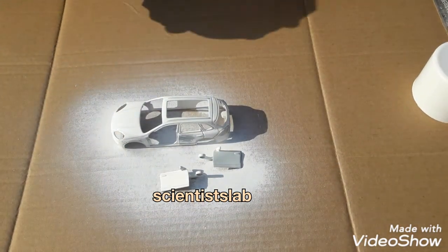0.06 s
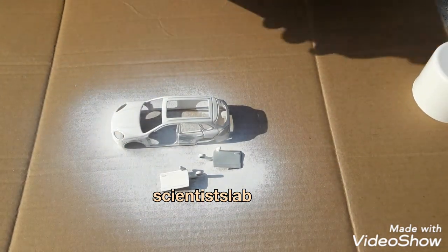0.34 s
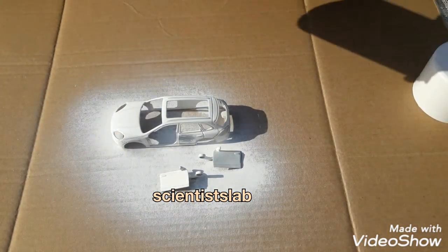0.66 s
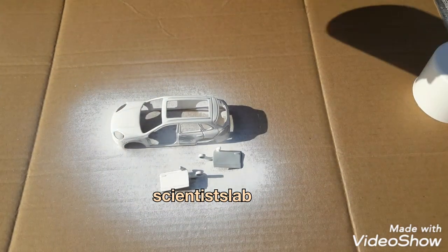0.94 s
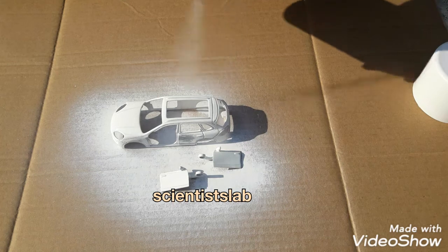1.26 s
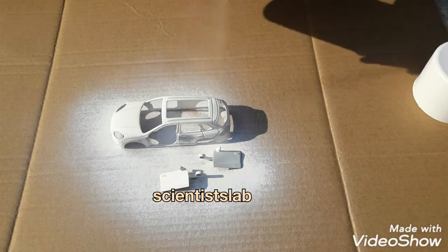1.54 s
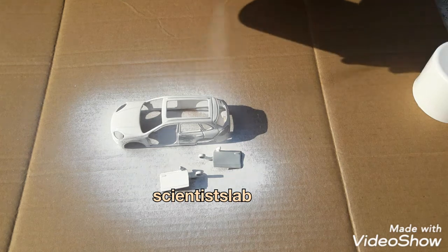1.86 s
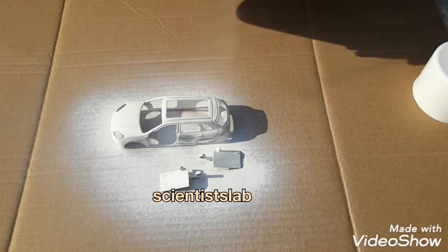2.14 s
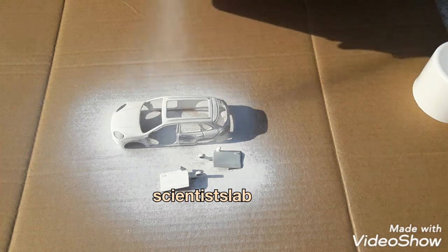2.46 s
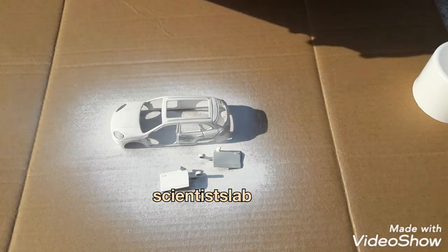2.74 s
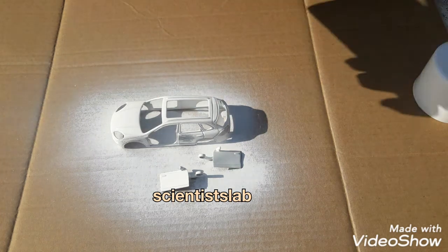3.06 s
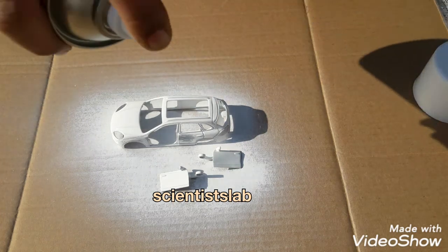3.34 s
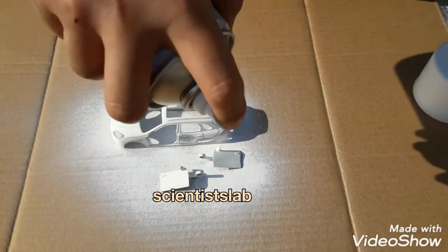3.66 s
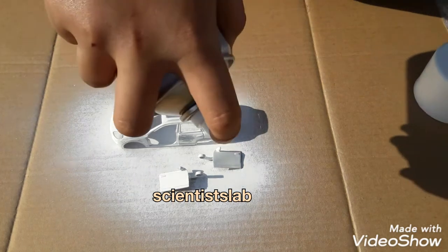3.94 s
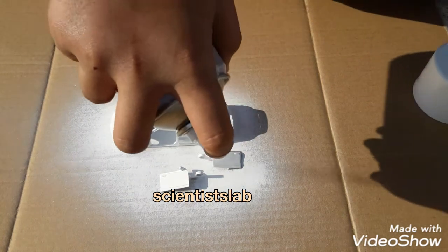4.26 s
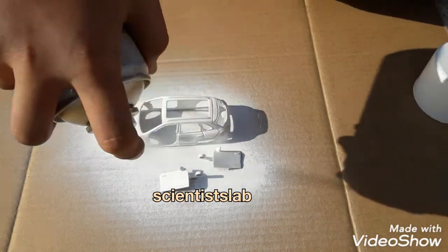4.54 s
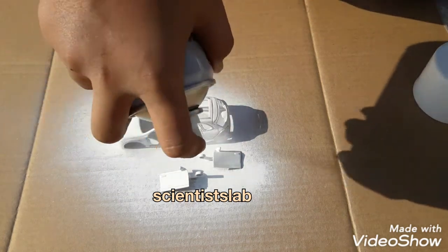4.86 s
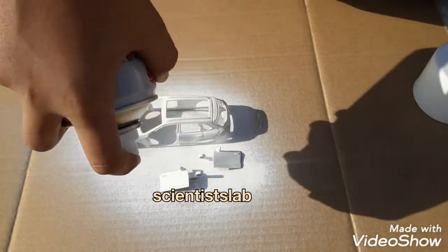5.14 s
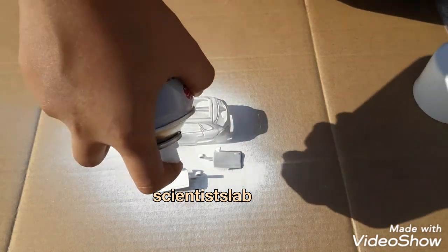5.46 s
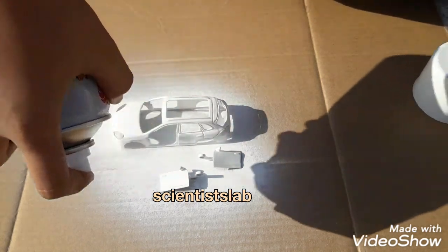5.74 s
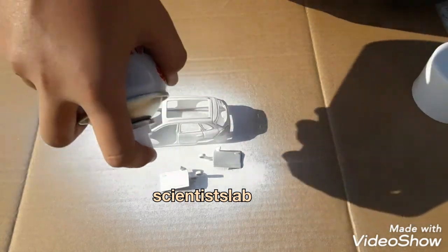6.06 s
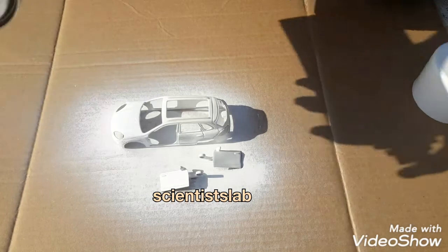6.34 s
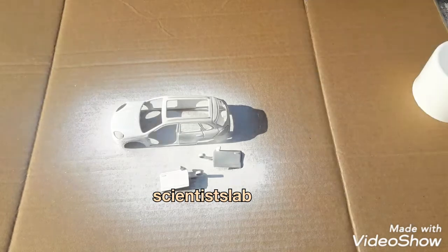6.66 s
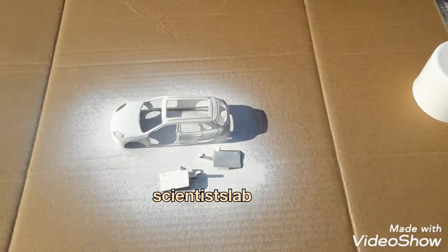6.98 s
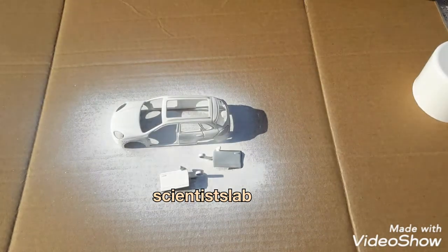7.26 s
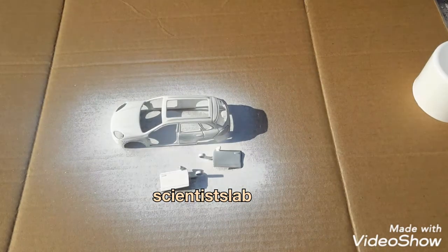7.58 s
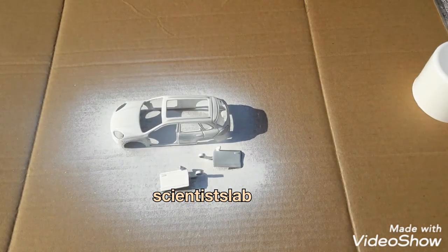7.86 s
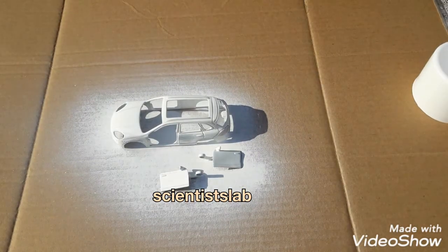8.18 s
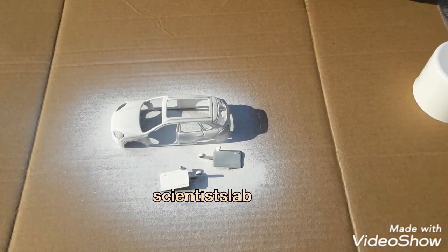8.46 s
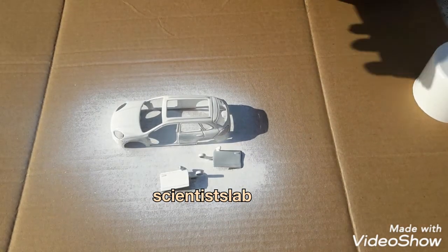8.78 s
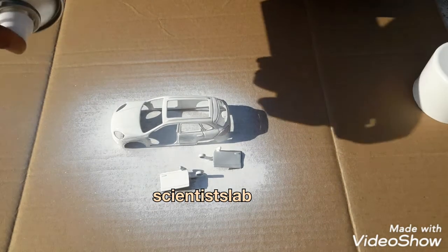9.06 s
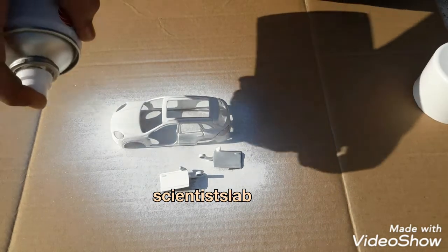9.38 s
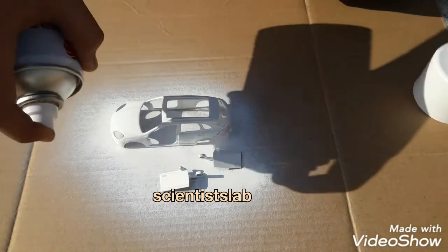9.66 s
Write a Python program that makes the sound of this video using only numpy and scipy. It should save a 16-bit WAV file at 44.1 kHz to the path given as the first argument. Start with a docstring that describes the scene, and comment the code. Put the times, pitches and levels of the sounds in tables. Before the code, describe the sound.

The mixing ball ticks inside a spray paint can as a bright, close hiss starts and sways over a small model. The spraying stops and returns for two more passes. In a longer pause the ball rattles lightly and the can brushes cardboard, then a few short spurts follow. The outdoor background is quiet, with low rumble, a thin motor whine and far birds.

```python
"""Spray painting in a yard

A small model on a cardboard sheet is painted with short bursts from an aerosol can.
The hiss mixes with its echo off the cardboard. The mixing ball pings and rolls inside
the can as it is tilted and handled, and the can scuffs over the sheet. Across the yard
an electric motor whines over a low rumble and the hiss of open air, and far birds chirp."""
import sys
import numpy as np
from scipy import signal
from scipy.fft import rfft, irfft, next_fast_len
from scipy.io import wavfile
from scipy.ndimage import map_coordinates

SR = 44100
rng = np.random.default_rng(int(sys.argv[2]) if len(sys.argv) > 2 else 0)


def pcm_store(signal):
    """Save signal as 16-bit PCM."""
    levels = np.round(np.clip(np.atleast_2d(signal), -1, 1) * 32767)
    wavfile.write(sys.argv[1], SR, levels.astype(np.int16).T)


N = 432621
TIME = np.arange(N) / SR
LOW_TOP_HZ, TREBLE_HZ = 2600, 8500   # borders between low, middle and treble


def from_db(db):
    """Turns decibels into a number to multiply by."""
    return 10 ** (np.asarray(db) / 20)


def rms_one(x):
    """The same signal with an average strength (rms) of 1."""
    return x / np.sqrt(np.mean(x ** 2) + 1e-20)


def in_time(rows):
    """Joins a table's rows with straight lines: one curve for each column after the time."""
    s, *columns = np.transpose(rows)
    return [np.interp(TIME, s, c) for c in columns]


def drift(rate):
    """A smooth random wobble that changes about rate times a second."""
    coarse = TIME[::32]
    wobble = map_coordinates(rng.standard_normal(4096), [coarse * rate], order=2, mode="wrap")
    return np.interp(TIME, coarse, wobble)


def noise(colour, band):
    """Noise of a given colour, with a strength of 1 inside the band (in Hz)."""
    size = next_fast_len(N)
    hz = np.fft.rfftfreq(size, 1 / SR)
    points, level_db = np.transpose(colour)
    gain = from_db(np.interp(np.log(hz + 1), np.log(points), level_db))
    gain *= np.minimum(hz / points[0], 1) ** 2
    gain /= np.sqrt(np.mean(gain ** 2 * ((hz > band[0]) & (hz < band[1]))))
    return irfft(rfft(rng.standard_normal(size)) * gain, size)[:N]


def split(x, hz):
    """The parts of a sound below and above a frequency."""
    filters = [signal.butter(2, hz, kind, fs=SR, output="sos") for kind in ("low", "high")]
    return [signal.sosfilt(np.tile(sos, (2, 1)), x) for sos in filters]


def scattered(x, echo_db, t60):
    """Adds echoes from things in the yard; they fade by 60 dB in t60 seconds."""
    t = TIME[:SR // 2]
    echoes = rng.standard_normal(len(t)) * 1000 ** (-t / t60)
    return x + from_db(echo_db) * signal.fftconvolve(x, echoes / np.linalg.norm(echoes))[:N]


# The colours of the rumble and the air. Each row: frequency in Hz, relative level in dB.
RUMBLE_COLOUR = [(20, -23), (45, -20), (75, -4.5), (110, -1.5), (140, 0), (190, -3.5), (260, -18),
                 (450, -22.5), (900, -89)]
AIR_COLOUR = [(120, -12), (280, 10.5), (450, 4.5), (620, 0.5), (800, 4.5), (1200, -2.5), (2100, 1),
              (2900, 1.5), (4200, 7), (6000, 3.5), (7000, 4), (8200, -9.5), (10200, -3), (16000, -7.5)]
# How each swells and sinks. Each row: time in seconds, relative level in dB.
RUMBLE_LEVEL = [(0.03, -40), (0.49, -37.5), (1.01, -35), (1.8, -37), (2.34, -36), (5.1, -43), (6.7, -44.5),
                (7.19, -54), (7.81, -53), (8.17, -45.5), (9.8, -57.5)]
AIR_LEVEL = [(0.03, -47.5), (1.28, -42.5), (1.77, -47), (2.6, -48), (2.9, -46.5), (4.0, -44), (4.6, -47.5),
             (5.31, -48), (5.66, -45), (6.72, -46), (7.32, -55), (7.62, -54.5), (7.97, -50.5),
             (8.14, -45.5), (8.6, -44.5), (8.87, -50), (9.8, -54)]
def yard(rumble_trim_db=1.0, air_trim_db=-2.43, lump_db=1.0):
    """A lumpy distant rumble, and the smooth hiss of open air echoing off nearby walls."""
    (rumble_db,), (air_db,) = in_time(RUMBLE_LEVEL), in_time(AIR_LEVEL)
    rumble, air = noise(RUMBLE_COLOUR, (50, 250)), noise(AIR_COLOUR, (300, 900))
    rumble *= from_db(rumble_db + rumble_trim_db + lump_db * drift(13))
    return rumble + scattered(air, echo_db=-9, t60=.06) * from_db(air_db + air_trim_db)


# Bird calls. Each row: start and length in seconds, first and last pitch in Hz, relative level in dB.
CHIRPS = [(0.793, 0.13, 4050, 4330, -35), (0.823, 0.061, 6150, 6160, -38),
          (5.064, 0.097, 2340, 2120, -41.5), (5.178, 0.14, 2480, 2400, -45),
          (5.265, 0.063, 2300, 1850, -42), (5.373, 0.044, 3470, 3750, -37),
          (5.411, .039, 3000, 1880, -33.5), (6.414, 0.11, 4400, 3050, -36), (7.357, 0.1, 2440, 1980, -47),
          (8.985, 0.076, 3650, 3170, -39), (9.094, 0.1, 2670, 2730, -44)]
def birds(bird_db=-4.5, quaver=.026, arch=0.017):
    """Far whistles that glide in a slight arch, blurred by echoes."""
    out, unsteady = np.zeros(N), 1 + quaver * drift(250)
    for start, length, first, last, level_db in CHIRPS:
        span = (TIME >= start) & (TIME < start + length)
        along = (TIME[span] - start) / length
        swell = np.sin(np.pi * along)
        hz = (first + (last - first) * along) * (1 + arch * swell) * unsteady[span]
        out[span] += from_db(level_db + bird_db) * swell * np.sin(2 * np.pi * np.cumsum(hz) / SR)
    return scattered(out, echo_db=3.0, t60=.22)


# The motor's speed. Each row: time in seconds, turns per second.
SHAFT_SPEED = [(7.5, 46.26), (8.1, 46.2), (8.6, 46.25), (9.2, 46.4), (9.81, 46.45)]
# Its tones. Each row: multiple of the speed, multiple of pull_hz added to it, relative level in dB.
WHINE_TONES = [(3, 0, -50), (10, 0, -54), (20, 0, -60), (36, 0, -47.5), (71, 0, -53.5), (72, 0, -50.5),
               (72, -1, -58), (72, 1, -58), (97, 0, -47.8), (107, 0, -51), (108, 0, -47), (108, -1, -53),
               (109, 0, -52.5), (115, 0, -57), (143, 0, -57), (144, 0, -48.5), (144, -1, -54)]
# How its low tones and those near 5 kHz swell. Each row: time in seconds, relative level in dB.
LOW_SWELL = [(0.05, -49.5), (1.13, -46), (1.54, -51), (2.76, -51.5), (3.63, -48), (4.88, -53.5),
             (6.32, -48), (7.38, -57), (7.9, -55.5), (8.44, -47.5), (9.06, -57.5), (9.8, -55.5)]
MID_SWELL = [(4.0, -0.5), (5.3, 2), (6.7, 1), (8.1, 1)]
def motor(motor_db=4.0, low_tones_db=-3.5, pull_hz=100, air_mean_db=-46, follows_air=0.87):
    """The motor's spinning slots whine; the shaft and the magnetic pull of the mains add side tones."""
    turns = np.cumsum(in_time(SHAFT_SPEED)[0] * (1 + .0003 * drift(5))) / SR
    (low_db,), (mid_db,), (air_db,) = in_time(LOW_SWELL), in_time(MID_SWELL), in_time(AIR_LEVEL)
    low_gain = from_db(low_db - low_db.mean() + motor_db + low_tones_db)
    high_gain = from_db(follows_air * (air_db - air_mean_db) + motor_db)
    out = 0
    for multiple, pull, level_db in WHINE_TONES:
        cycles = multiple * turns + pull * pull_hz * TIME + rng.random() + .05 * drift(14)
        gain = low_gain if multiple < 50 else high_gain
        if 107 <= multiple <= 109:   # the tones near 5 kHz
            gain = gain * from_db(mid_db)
        waver = 1 + .22 * drift(12)   # each tone wavers on its way through the air
        out = out + gain * from_db(level_db) * waver * np.sin(2 * np.pi * cycles)
    return out


# The can scuffs the sheet. Each row: start in seconds, length in seconds, level in dB.
SCUFFS = [(6.9, 0.31, -52), (8.335, 0.44, -42.5)]
# The colour of a scuff. Each row: frequency in Hz, relative level in dB.
SCUFF_COLOUR = [(350, -3), (560, 1), (1050, -6), (1900, 0), (3500, -1.5), (8000, -20)]
def scuffs(grit_db=10.5, catch_rate=110):
    """The can's rim catches and slips on the hollow cardboard; each stroke swells and dies."""
    strokes = sum(from_db(level_db) * np.sin(np.pi * np.clip((TIME - start) / length, 0, 1))
                  for start, length, level_db in SCUFFS)
    return strokes * rms_one(noise(SCUFF_COLOUR, (0, SR)) * from_db(grit_db * drift(catch_rate)))


# The notes of the filled can. Each row: pitch in Hz, relative level in dB, seconds to fade by 60 dB.
CAN_NOTES = [(528, -23.5, 0.18), (812, -5.5, 0.018), (1150, 0.5, 0.016), (1520, 1.5, 0.021),
             (1777, 1.5, 0.022), (2080, 7.5, 0.023), (2400, 1.5, 0.018), (3400, 15, 0.0054),
             (3560, 11, 0.011), (4540, 23, 0.0042), (5430, 18, 0.0055), (6540, 11.5, 0.014),
             (7300, 5, 0.015), (10420, -1, 0.01), (11430, -3, 0.012), (12000, -1, 0.0081),
             (14100, -2, 0.0081)]
# The colour of the crack as the ball hits. Each row: frequency in Hz, relative level in dB.
CRACK_COLOUR = [(200, -15), (700, -7), (1700, 2.5), (2850, 3), (3600, 12.5), (4700, 9), (6800, 2.5),
                (8500, -3), (10800, -9.5), (15800, -4)]
# The ball's knocks. Each row: start in seconds, level of the middle part in dB,
# level of the low part against it in dB, ping of the struck spot in Hz.
KNOCKS = [(1.1683, -12.5, -29, 4780), (1.2426, -19, -23, 3600), (1.306, -14.5, -15.5, 4900),
          (1.3104, -17, -15, 6200), (1.3717, -21, -25, 3680), (1.4145, -22, -28, 3650),
          (1.5029, -23.5, -12.5, 5300), (1.7715, -17.5, -26, 4070), (1.796, -29, -9, 6740),
          (1.8108, -17.5, -21.5, 4270), (1.92, -22.5, -12, 3700), (1.949, -24.5, -12, 3820),
          (2.7733, -25, -6, 3580), (2.8107, -20, -5, 6740), (2.9026, -19, -11.5, 3700),
          (2.9155, -18, -5, 3760), (3.0052, -26, -6.5, 4400), (3.0586, -26, -7.5, 3630),
          (3.081, -28, -4.5, 4600), (3.1314, -31, -9, 4200), (3.902, -12, -10.5, 4610),
          (3.914, -17, -22, 5630), (3.9578, -18.5, -9.5, 3670), (4.005, -15, -19.5, 4540),
          (4.0254, -16.5, -15, 4200), (4.033, -18, -13, 4400), (4.0625, -22, -5, 3100),
          (4.1075, -22, -14.5, 4760), (4.1561, -27, -14, 4400), (4.1655, -22.5, -12, 4940),
          (4.3145, -26, -18.5, 3900), (6.34, -24.5, -18, 5570), (6.7156, -14.5, -12.5, 6900),
          (6.726, -18.5, -10, 5230), (6.7308, -19.5, -17, 7300), (6.7355, -16, -11, 6760),
          (6.741, -17.5, -7, 7000), (6.7663, -23, -6, 4070), (6.8603, -30, -8.5, 4440),
          (6.9162, -32, -3.5, 4860), (6.932, -33, 4.5, 5040), (6.9378, -27, 1.5, 5270),
          (6.97, -34, 0.5, 5000), (6.9918, -40.5, 3, 3400), (7.0731, -38, 2, 3500), (7.2667, -40, -4, 3400),
          (8.1303, -23.5, -12.5, 4500), (8.1464, -19, -5, 4500), (8.2092, -27.5, -4, 4350),
          (8.3805, -24, -1, 4200), (8.3835, -25.5, 6, 4100), (8.4908, -22, -6.5, 4700),
          (8.55, -24, -1, 4330), (8.556, -19, 4.5, 4070), (8.5706, -26, 6.5, 4000),
          (8.5925, -15, -30, 5240), (8.6017, -24, 8.5, 3470), (8.6471, -22, -5, 5490),
          (8.6544, -26, 3.5, 3400), (8.6968, -20, -5, 3900), (8.7002, -17, -3, 3130),
          (8.7549, -22, -3.5, 4130), (8.822, -28.5, -4.5, 5030), (9.407, -28, -8.5, 4300),
          (9.4578, -31, -10, 4800), (9.604, -21.5, -17.5, 4560)]
def ball_knocks(knocks, crack_db=-1.5, crack_t60=0.014, tail_db=-15.5, tail_t60=0.11,
                scatter_db=6.5, contact_s=0.00061, usual_ping_hz=4390, ping_t60=0.011):
    """The ball hits the wall: a ring dulled by the paint, a ping, and a crack with a faint tail."""
    t = np.arange(SR // 12) / SR
    hz, note_db, t60 = np.transpose(CAN_NOTES)
    note_band = np.digitize(hz, [LOW_TOP_HZ, TREBLE_HZ])
    low, rest = split(noise(CRACK_COLOUR, (0, SR)), LOW_TOP_HZ)
    cracks = [low, *split(rest, TREBLE_HZ)]
    fade = 1000 ** (-t / crack_t60) + from_db(tail_db) * 1000 ** (-t / tail_t60)
    attack = 1 - np.exp(-(t / contact_s) ** 2)
    out = np.zeros(N + len(t))
    for start, level_db, low_db, ping_hz in knocks:
        strength, phase, detune = rng.standard_normal((3, len(hz), 1))
        # the sloshing paint weighs on the wall differently at every knock
        swing = np.sin(2 * np.pi * (hz[:, None] * (1 + 0.012 * detune) * t + phase))
        rings = from_db(note_db[:, None] + scatter_db * strength) * swing * 1000 ** (-t / t60[:, None])
        at, pick = round(start * SR), rng.integers(N - len(t))
        ping = rms_one(np.sin(2 * np.pi * ping_hz * t) * 1000 ** (-t / ping_t60))
        treble_db = -9.5 + 8 * np.log2(ping_hz / usual_ping_hz)   # harder blows are higher and brighter
        for band, share_db in enumerate((low_db, 0, treble_db)):
            crack = from_db(crack_db) * rms_one(cracks[band][pick:pick + len(t)] * fade)
            part = rms_one(rings[note_band == band].sum(0)) + crack + ping * (band == 1)
            part = rms_one(part * attack) * np.sqrt(.005 / t[-1])   # as if its energy filled 5 ms
            out[at:at + len(t)] += from_db(level_db + share_db) * part
    return out[:N]


def ball_rolling(knocks, roll_db=-49.0, ticks_per_s=900, settle_s=.08, spread_db=5.0, roll_hz=2440):
    """After each knock the ball rolls on along the wall and ticks faintly until it settles."""
    kicks = np.zeros(N)
    for start, _, low_db, _ in knocks:
        kicks[round(start * SR)] = min(from_db(low_db), 1)   # deep knocks set it rolling most
    motion = np.minimum(signal.lfilter([1], [1, -np.exp(-1 / (settle_s * SR))], kicks + 1e-18), 1)
    sizes = from_db(roll_db + spread_db * np.clip(rng.standard_normal(N), -2, 2))
    ticks = sizes * (rng.random(N) < ticks_per_s * motion / SR)
    at, out = np.flatnonzero(ticks), np.zeros(N)
    for hz, note_db, t60 in CAN_NOTES:
        if hz < TREBLE_HZ:
            decay, angle = from_db(-60 / (t60 * SR)), 2 * np.pi * hz / SR
            gain = from_db(note_db - 9.5 * abs(np.log2(hz / roll_hz))) / 2   # favours notes near roll_hz
            blows = np.full(N, 1e-18)
            blows[at] = ticks[at] * rng.standard_normal(len(at)) * gain
            out += signal.lfilter([0, np.sin(angle)], [1, -2 * decay * np.cos(angle), decay ** 2], blows)
    return out


# Presses on the nozzle. Each row: start, let-go time, rise and fall in seconds, opening in dB.
PRESSES = [(1.034, 1.886, 0.098, 0.14, -0.5), (1.86, 2.69, 0.035, 0.033, -1),
           (3.42, 3.652, .09, 0.65, -15.5), (4.01, 5.071, 0.1, 0.05, -1.5),
           (5.441, 6.197, 0.061, 0.041, -0.5), (6.2, 6.617, .04, .19, -23), (9.22, 9.383, 0.12, 0.052, -5),
           (9.512, 9.61, 0.039, 0.087, -6), (9.752, 9.81, 0.045, .04, -3)]
def valve():
    """The flow through the nozzle: each press opens it wide or just a crack, then lets it close."""
    flow = np.zeros(N)
    for start, end, rise_s, fall_s, opening_db in PRESSES:
        gate = np.clip(np.minimum((TIME - start) / rise_s, 1 - (TIME - end) / fall_s), 0, 1)
        flow = np.maximum(flow, from_db(opening_db) * gate)
    return flow


# The main echo, off the cardboard or hand. Each row: time in seconds, delay in ms, strength from 0 to 1.
MAIN_ECHO = [(1.03, .683, .6), (1.27, .628, .55), (1.45, .645, .15), (1.76, .59, .12), (1.92, .552, .3),
             (2.15, .592, .15), (2.28, .617, .48), (2.45, .665, .43), (2.6, .745, .42), (2.71, .8, .45),
             (4.05, 1.55, .35), (4.42, 1.2, .3), (4.52, .18, .25), (4.78, .175, .3), (4.97, .27, .42),
             (5.45, .165, .3), (5.8, .215, .35), (6.2, .185, .42), (9.2, .635, .45), (9.53, .55, .62),
             (9.81, .48, .4)]
# Weaker echoes off the hand, model and can. Each row: delay in ms, strength from 0 to 1.
NEAR_ECHOES = [(.11, .1), (.36, .17), (.95, .17), (1.3, .17)]
def with_reflections(jet, wander_ms=.07):
    """Close echoes boost some pitches and cancel others; the pattern slides as the hand sways."""
    lag_ms, bounce = in_time(MAIN_ECHO)
    paths = [(lag_ms, bounce), (2 * lag_ms, bounce ** 2 / 2)]
    paths += [(ms + wander_ms * drift(3), strength) for ms, strength in NEAR_ECHOES]
    echoes = sum(strength * map_coordinates(jet, [(TIME - ms / 1000) * SR], order=3)
                 for ms, strength in paths)
    return (jet + echoes) / np.sqrt(1 + bounce ** 2)


# The colour of the jet. Each row: frequency in Hz, relative level in dB.
JET_COLOUR = [(200, -14), (600, -19.5), (1300, -8), (2400, -6.5), (3400, -2), (5200, -2.5), (7000, 1.5),
              (8200, -7.5), (10300, -1), (11800, 1.5), (13600, 0.5), (15100, -0.5), (16200, -3)]
# The jet's aim. Each row: time in seconds, gain below the treble in dB,
# extra gain for the low rush of the jet on the model in dB.
AIM = [(1.15, 1, -7), (1.7, 2.5, -11), (2.4, 0.5, -25), (2.7, -1, -33), (4.15, 0.5, 1.5), (4.6, -3, -2.5),
       (5.0, -0.5, 0), (5.55, 0.5, 8.5), (5.9, 0, -9), (6.15, -0.5, 6), (9.35, 1, 0), (9.8, 0, -0.5)]
# The can sways during three long passes. Each row: time in seconds, relative hiss level in dB.
FIRST_PASS = [(1.13, -27), (1.254, -28), (1.402, -32.5), (1.862, -38.5), (1.946, -27.5), (2.252, -31),
              (2.3, -28), (2.68, -26.5)]
SECOND_PASS = [(4.14, -27.5), (4.382, -30), (4.64, -24), (4.986, -29.5), (5.07, -28.5)]
THIRD_PASS = [(5.5, -31), (5.674, -29.5), (5.696, -30.5), (5.95, -27.5), (6.19, -26)]
def spray(flutter_db=0.82, flutter_rate=70):
    """The swirling jet hisses while the valve is open, and rushes where it hits the model."""
    sway_db, = in_time(np.vstack([FIRST_PASS, SECOND_PASS, THIRD_PASS]))
    lower_db, rush_db = in_time(AIM)
    rest, treble = split(noise(JET_COLOUR, (9500, 15800)), TREBLE_HZ)
    rush, middle = split(rest, LOW_TOP_HZ)
    jet = (rush * from_db(rush_db) + middle) * from_db(lower_db) + treble
    return jet * valve() * from_db(sway_db + flutter_db * drift(flutter_rate))


def scene():
    """All the sounds added together, the same in both channels."""
    mix = with_reflections(spray()) + motor() + yard() + birds()
    mix = mix + ball_knocks(KNOCKS) + ball_rolling(KNOCKS) + scuffs()
    return np.tile(mix, (2, 1))


def record(dry):
    """Flattens the loudest peaks and cuts the treble above 15800 Hz."""
    treble_cut = signal.ellip(12, .1, 70, 15800, fs=SR, output="sos")
    return signal.sosfilt(treble_cut, np.clip(dry, -.85, .85))


dry = scene()
out = record(dry)
pcm_store(out)
```